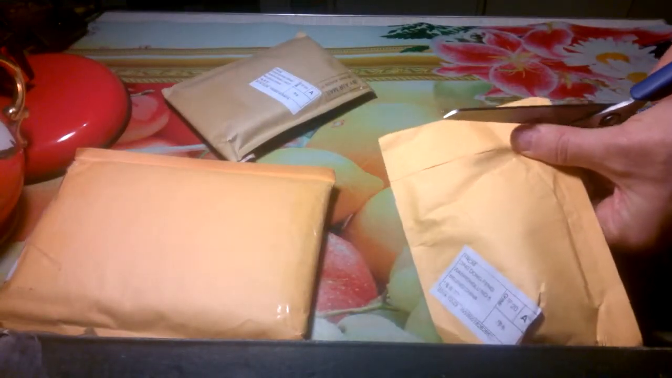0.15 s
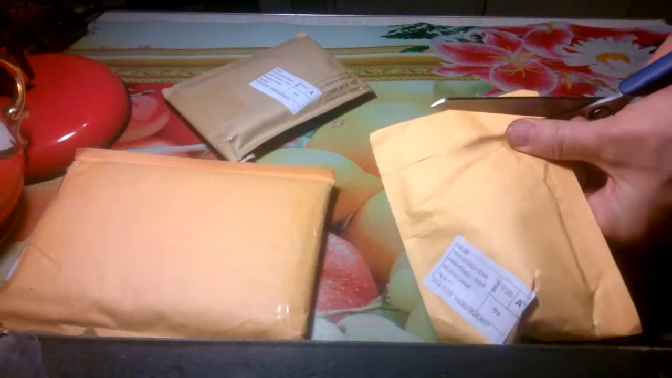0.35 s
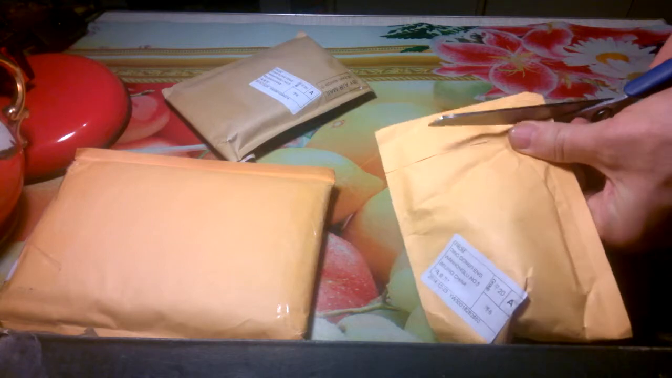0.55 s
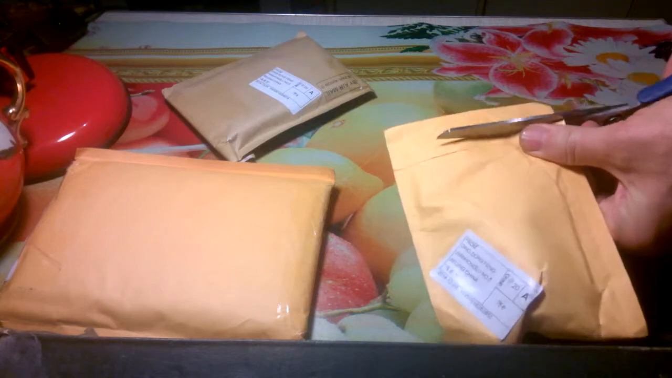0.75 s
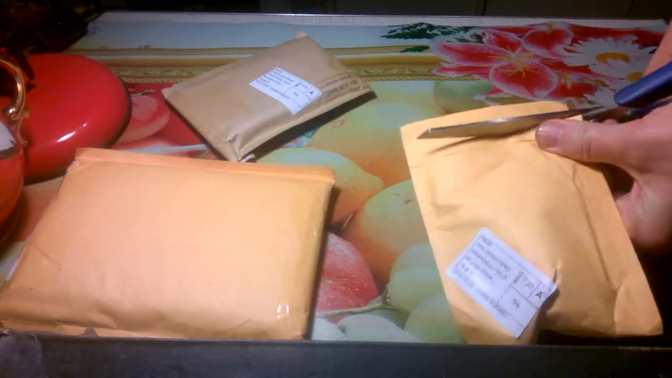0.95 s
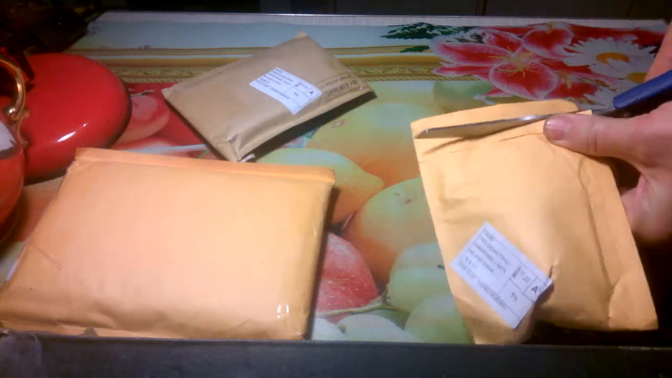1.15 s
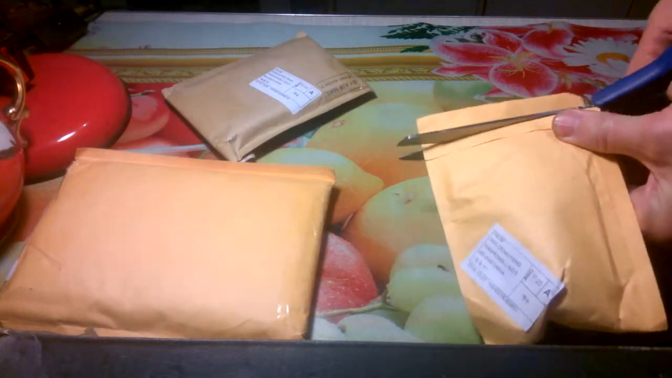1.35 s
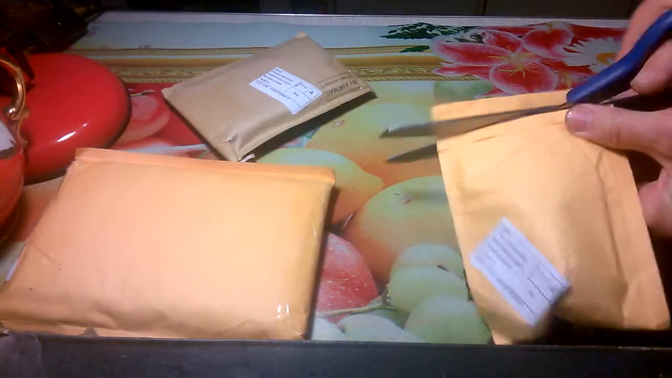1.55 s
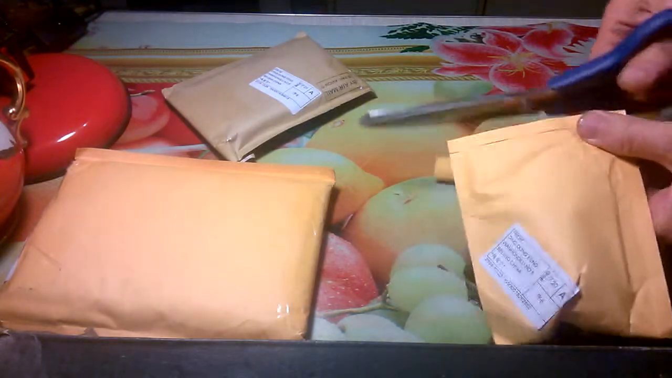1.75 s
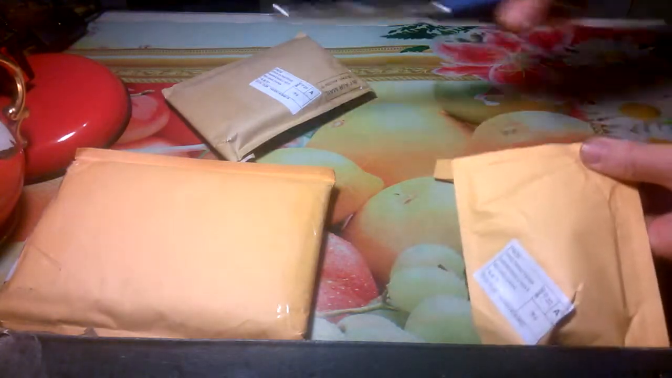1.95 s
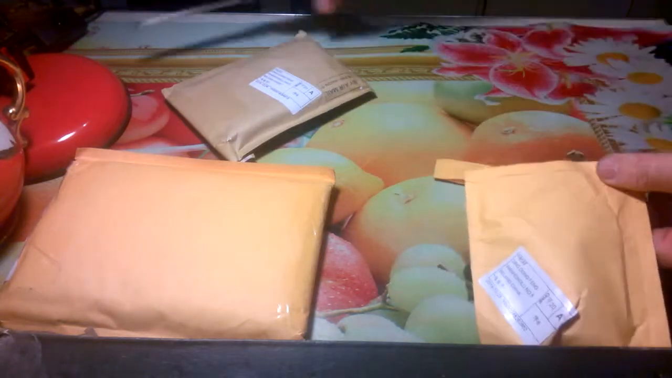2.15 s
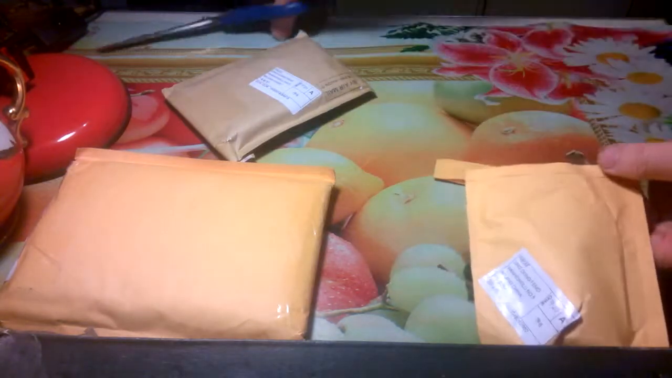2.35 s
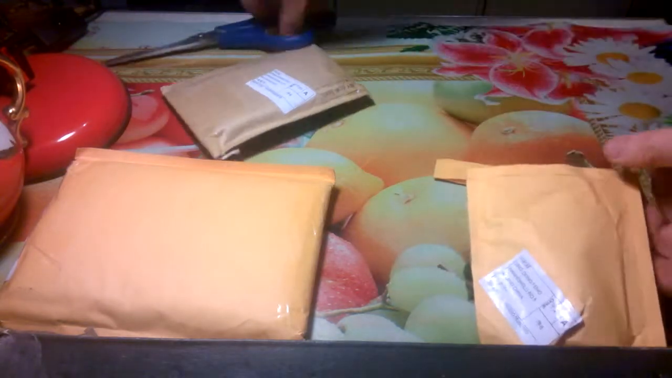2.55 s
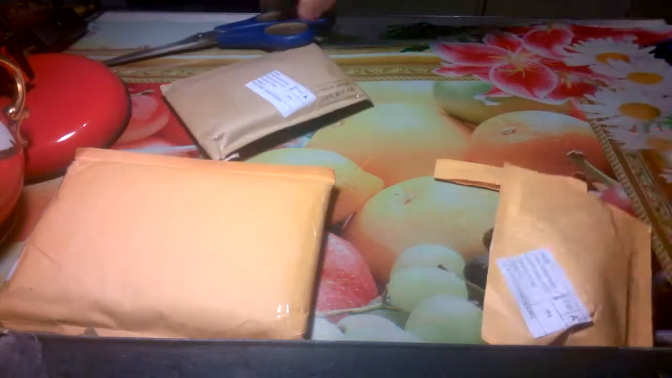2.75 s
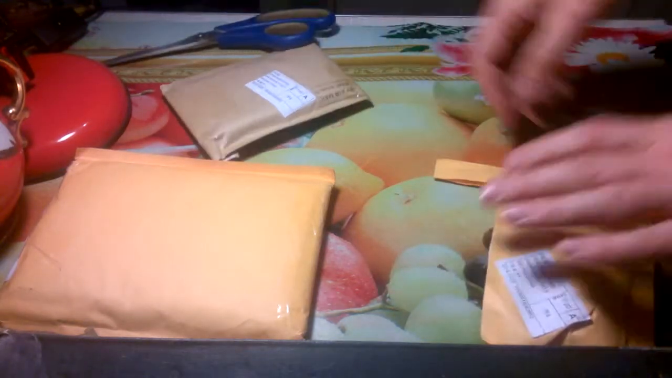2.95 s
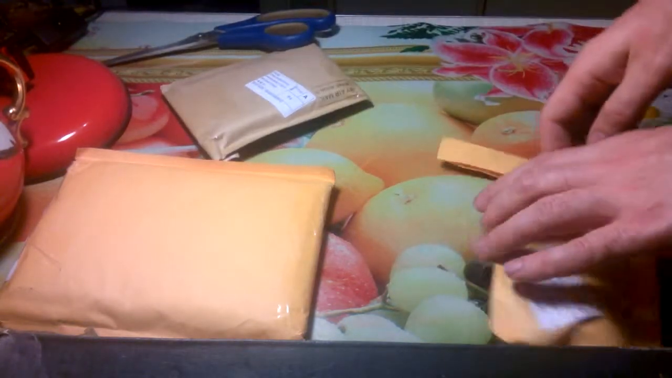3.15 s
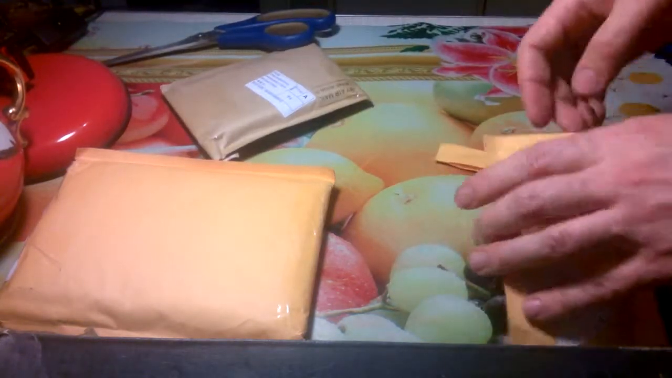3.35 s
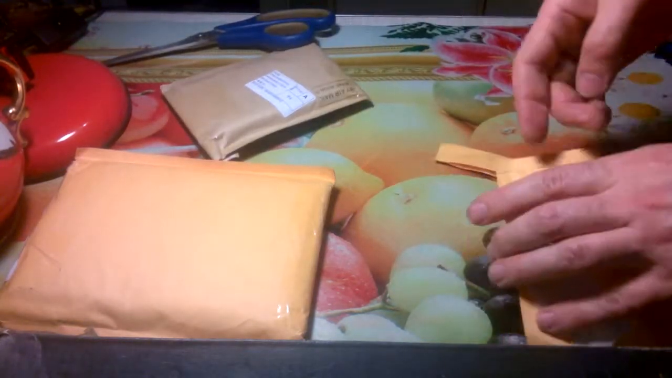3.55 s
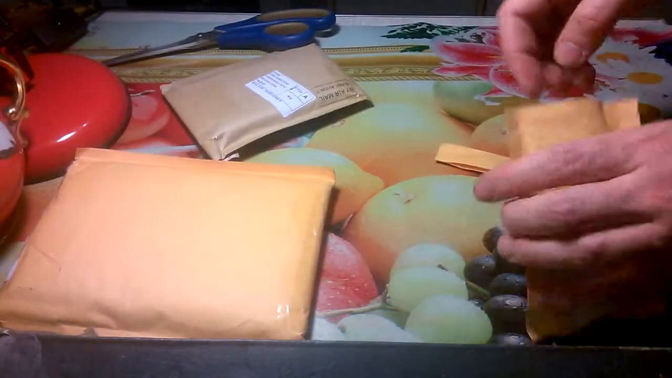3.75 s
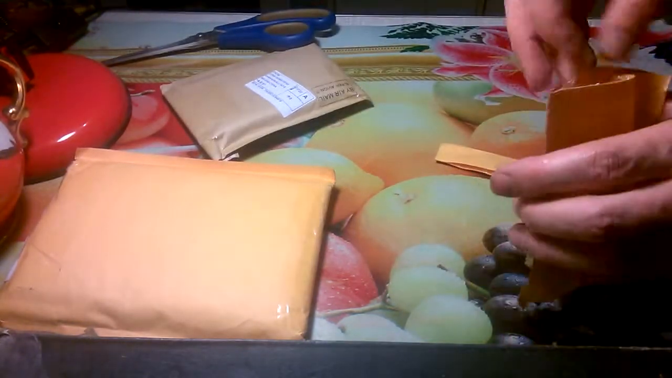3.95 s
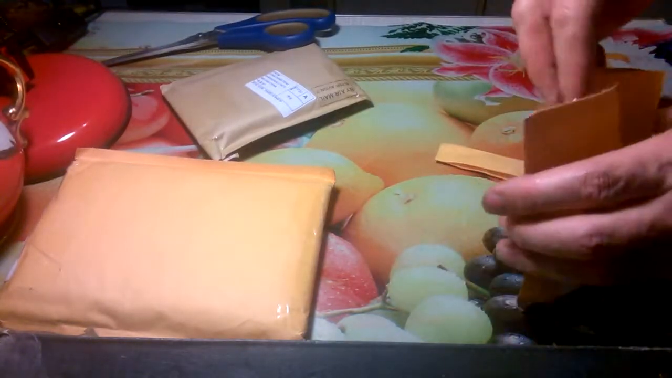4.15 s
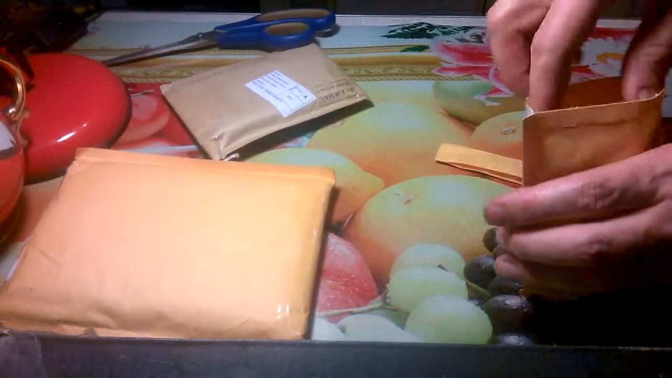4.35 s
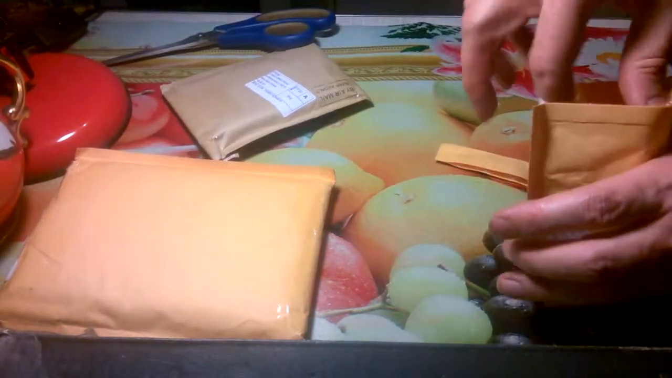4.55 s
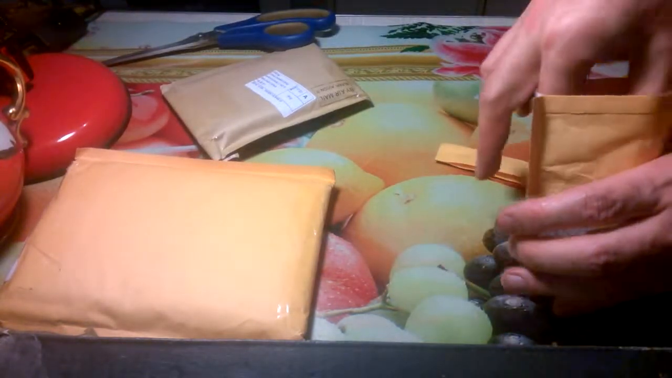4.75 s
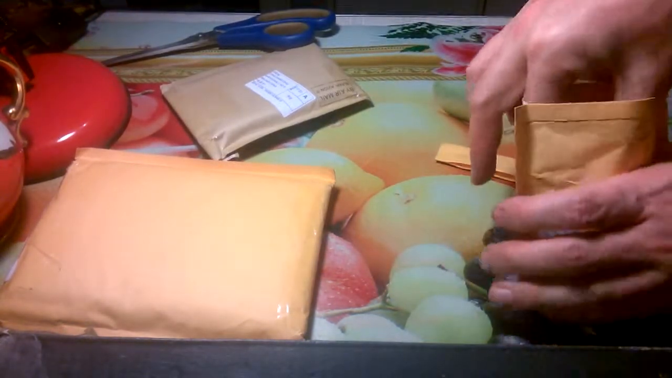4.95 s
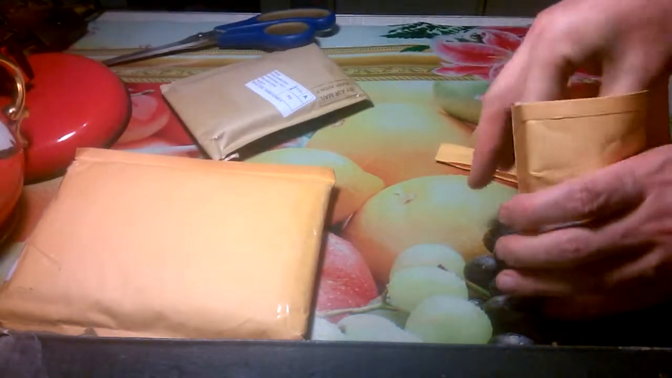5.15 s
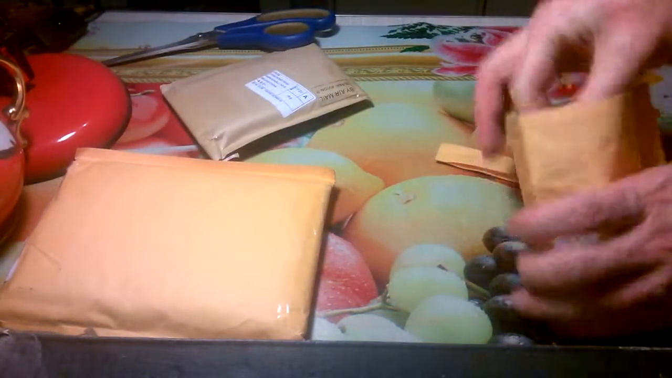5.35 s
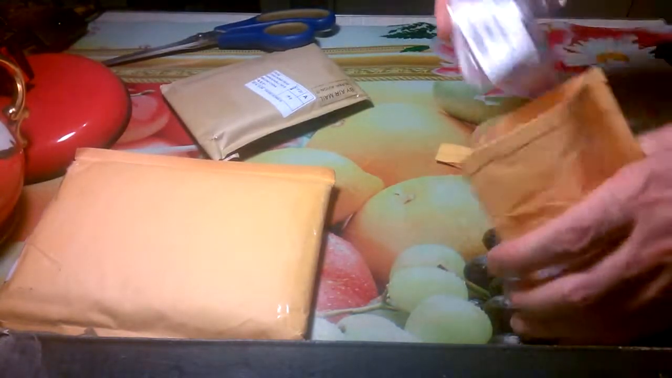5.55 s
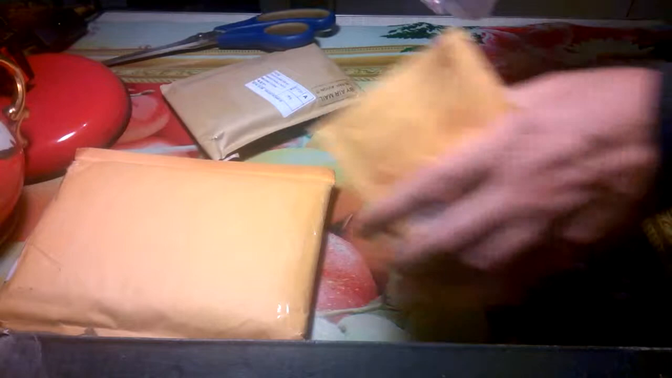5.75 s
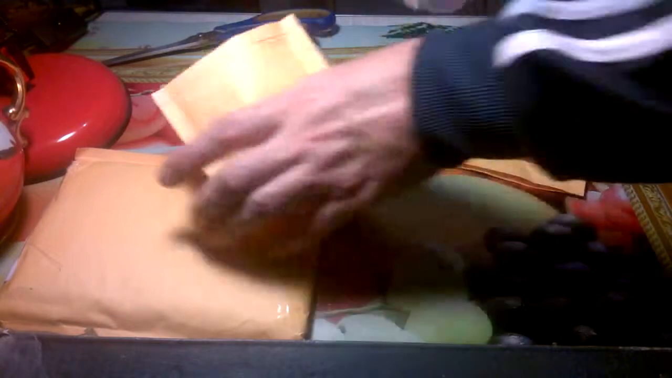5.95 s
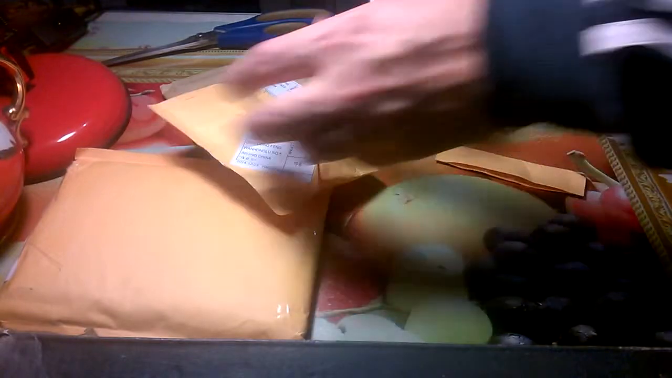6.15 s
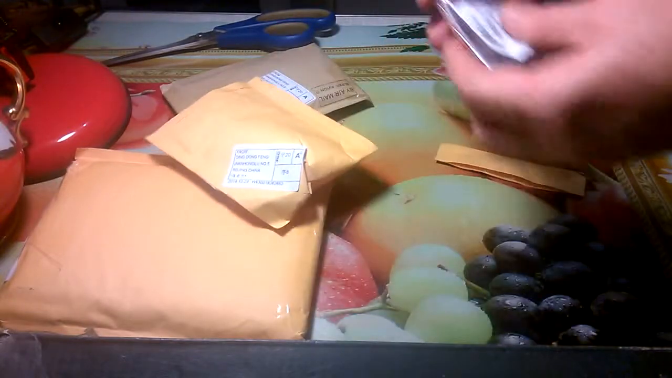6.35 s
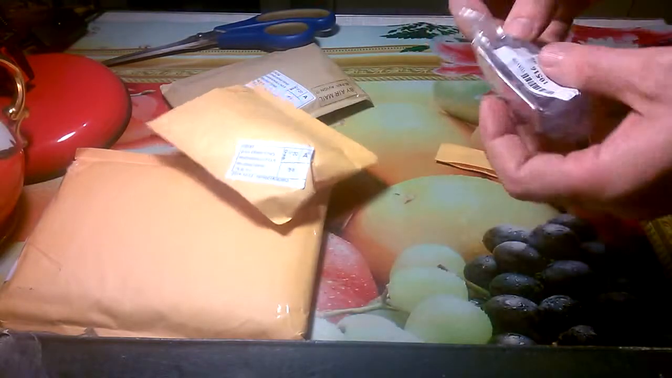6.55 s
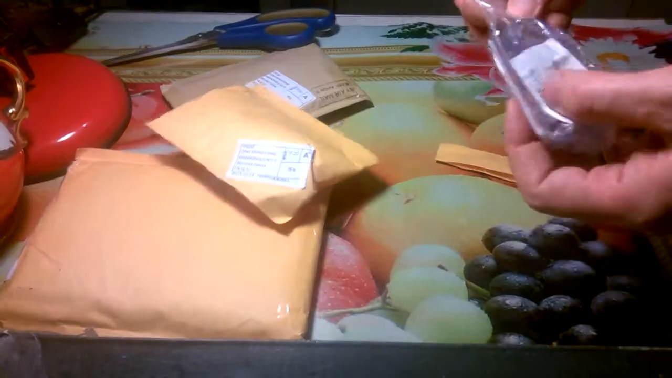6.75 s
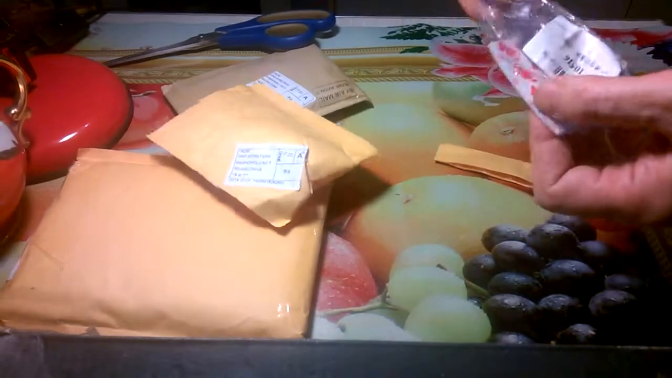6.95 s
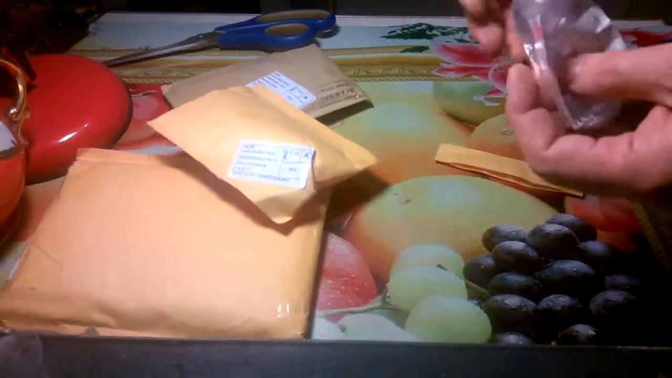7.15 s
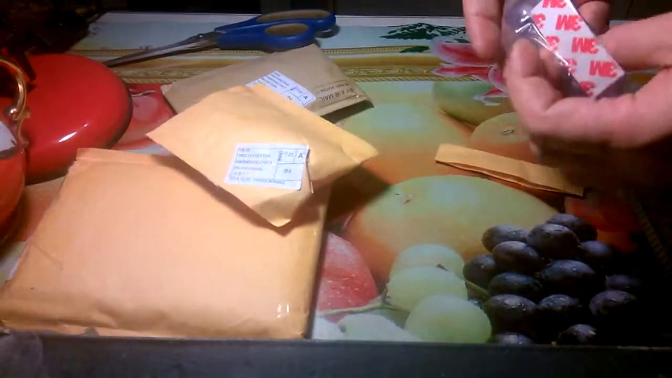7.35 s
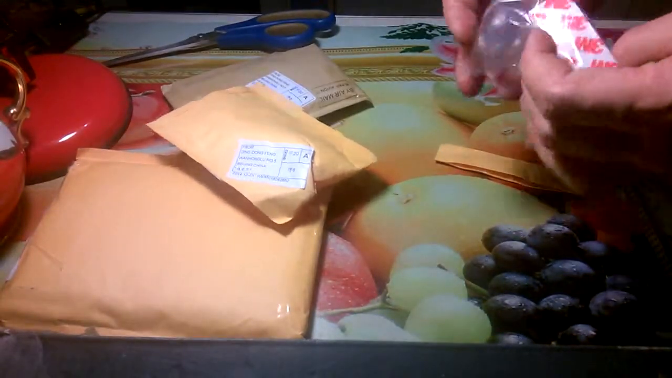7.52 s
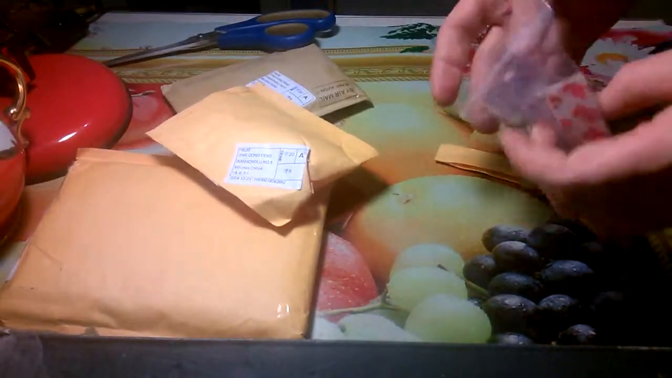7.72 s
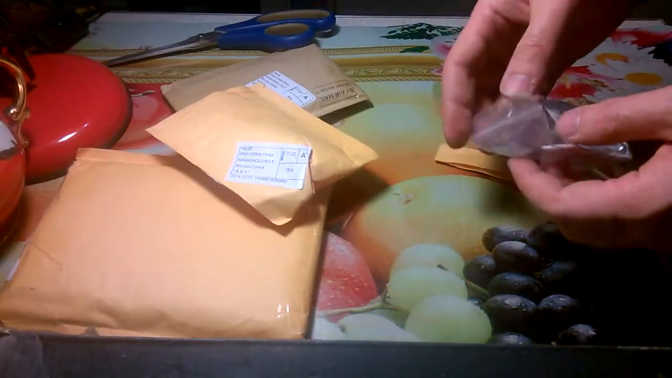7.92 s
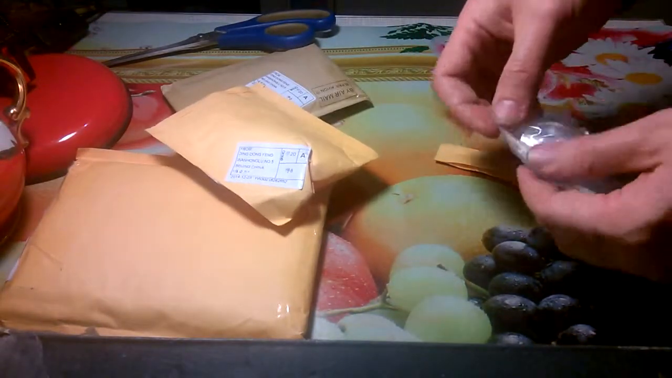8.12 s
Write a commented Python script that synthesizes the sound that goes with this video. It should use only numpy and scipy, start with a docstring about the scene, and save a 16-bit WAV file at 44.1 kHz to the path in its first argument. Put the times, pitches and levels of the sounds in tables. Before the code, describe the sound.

Scissors snip through a stiff padded paper envelope, get set down with a thud and clack, then paper rustles and a thin plastic bag crinkles.

```python
"""At a table in a small, hard-walled room with a faint hum, scissors cut the top off a padded paper mailer.
The scissors are put down; fingers spread the mailer, dig in it and pull out a small plastic bag.
The mailer is tossed aside and the bag is crinkled. One microphone channel; most direct sound tops its echoes.
Both sheets sound by friction and by buckling: a few loud snaps over many tiny ones, each answered by the room."""
import sys
import numpy as np
from scipy import signal
from scipy.fft import rfft, irfft, next_fast_len
from scipy.io import wavfile
from scipy.ndimage import uniform_filter1d, map_coordinates

SR = 44100
rng = np.random.default_rng(int(sys.argv[2]) if len(sys.argv) > 2 else 0)


def inscribe(sig):
    """Save sig as 16-bit PCM at rate SR to the path in sys.argv[1].

    A 1-D sig is mono; a 2-D sig holds one channel per row.
    Samples are clipped to [-1, 1] before scaling.
    """
    pcm = np.round(np.clip(np.atleast_2d(sig).T, -1, 1) * 32767)
    wavfile.write(sys.argv[1], SR, pcm.astype(np.int16))


N = 360940
TIME = np.arange(N) / SR  # s
FLEX_HZ, FIZZ_HZ, SPARKLE_HZ = 2200, 7800, 11000  # band edges: panels flex below, creases fizz and sparkle above
CRACK_LIFE_S = 0.0007  # a crease flips almost at once
SNAP_WET_DB = -3  # the walls' answer to a snap


def amp(db):
    """Decibels to amplitude."""
    return 10 ** (np.asarray(db) / 20)


def unit(x):
    """Scale a sound to rms 1."""
    return x / np.sqrt(np.mean(x ** 2) + 1e-20)


def along(points, hz):
    """Read a curve of (Hz, value) points on a log frequency axis."""
    point_hz, values = np.transpose(points)
    return np.interp(np.log(hz + 1), np.log(point_hz), values)


def wobble(rate):
    """A smooth random curve, rate knots a second."""
    knots = rng.standard_normal(int(N * rate / SR) + 4)
    return map_coordinates(knots, [TIME * rate])


def add(track, start_s, sound):
    """Mix a sound into a track from start_s."""
    part = track[max(round(start_s * SR), 0):][:len(sound)]
    part += sound[:len(part)]


def below(hz, edge_hz):
    """Gain of a steep low-pass."""
    return 1 / np.sqrt(1 + (hz / edge_hz) ** 10)


def above(hz, edge_hz):
    """Gain of the matching high-pass."""
    return np.sqrt(1 - below(hz, edge_hz) ** 2)


def bell(hz, pitch_hz, q):
    """Gain of one damped resonance; a higher q is narrower."""
    return 1 / np.sqrt(1 + (q * (hz / pitch_hz - pitch_hz / (hz + 1))) ** 2)


def colour(x, gain, size=4096):
    """Causal (minimum-phase) filter with a given gain over frequency."""
    hz = np.fft.rfftfreq(size, 1 / SR)
    cepstrum = irfft(np.log(np.maximum(gain(hz), 1e-6)))
    # fold the cepstrum onto positive time so the response starts at once
    cepstrum[1:size // 2] *= 2
    cepstrum[size // 2 + 1:] = 0
    response = irfft(np.exp(rfft(cepstrum)))
    return signal.fftconvolve(x, response)[:len(x)]


# how long the small room rings: pitch_hz [Hz], t60_s [s]
ROOM_DECAY = [(150, 0.23), (1000, 0.16), (5000, 0.27), (14000, 0.19)]


def room_tail(gap_s=0.0013, build_s=0.0045, size=8192):
    """The walls' answer, energy 1: a short gap, a swell of echoes, then decay."""
    hz, t, z = signal.stft(rng.standard_normal(size), SR, nperseg=256)
    decay = amp(-60 * t / along(ROOM_DECAY, hz)[:, None])
    tail = signal.istft(z * decay, SR, nperseg=256)[1][:size]
    since_gap = np.maximum(np.arange(size) / SR - gap_s, 0)
    tail = tail * (1 - np.exp(-since_gap / build_s))
    return tail / np.linalg.norm(tail)


def in_room(x, wet_db):
    """A sound plus its echoes off the walls."""
    return x + amp(wet_db) * signal.fftconvolve(x, room_tail())[:len(x)]


def shifting(x, depth_db):
    """A bending sheet's resonances come and go, in narrow and in wide patches of pitch."""
    z = signal.stft(x, nperseg=1024)[2]

    def patches(bins):
        noise = uniform_filter1d(rng.standard_normal(z.shape), bins, axis=0)
        return unit(uniform_filter1d(noise, size=7, axis=1))

    change_db = depth_db * (patches(bins=3) + 3.2 * patches(bins=14))
    return signal.istft(z * amp(change_db), nperseg=1024)[1][:N]


def crackle(rate, spread_db, friction_db):
    """Tiny buckles of very uneven size, rate a second, over a wash of friction; rms 1."""
    sizes = amp(spread_db * np.minimum(rng.exponential(size=N), 4))
    happens = rng.random(N) < rate / SR
    ticks = happens * sizes * rng.choice([-1, 1], N)
    return unit(unit(ticks) + amp(friction_db) * rng.standard_normal(N))


def swells(rows, rise, fall):
    """Each movement builds up, holds and dies away at fixed dB per s; overlapping ones add in power."""
    power = np.zeros(N)
    for start_s, length_s, level_db in rows:
        t = np.arange(-SR // 7, length_s * SR + SR // 4) / SR
        slope_db = rise * np.maximum(-t, 0) + fall * np.maximum(t - length_s, 0)
        shape = amp(level_db - slope_db) ** 2
        add(power, start_s + t[0], shape[start_s + t >= 0])
    return np.sqrt(power)


def effort(rows, rise, fall):
    """How strongly a series of movements makes a sheet scrape, flex and fizz."""
    scrape = swells([(s, length, db) for s, length, db, _, _ in rows], rise, fall)
    flex = swells([(s, length, db + flex_db) for s, length, db, flex_db, _ in rows], rise, fall)
    fizz = swells([(s, length, db + fizz_db) for s, length, db, _, fizz_db in rows], rise, fall)
    return np.array([scrape, flex, fizz])


def rustle(drive, spectrum, grain, hard_db, steepness, unsteady_db):
    """Whole panels flex low, surfaces scrape higher, creases fizz; hard strokes sparkle more at the very top."""
    scrape, flex, fizz = drive
    sparkle = fizz * np.clip(fizz / amp(hard_db), 0.26, 1.9) ** steepness
    size = next_fast_len(N)
    hz = np.fft.rfftfreq(size, 1 / SR)
    sheet = rfft(colour(grain, lambda f: amp(along(spectrum, f))), size)

    def band(gain):
        return irfft(sheet * gain ** 2, size)[:N]

    low = unit(band(below(hz, FLEX_HZ))) * flex
    middle = unit(band(above(hz, FLEX_HZ) * below(hz, FIZZ_HZ))) * scrape
    treble, top = band(above(hz, FIZZ_HZ)), band(above(hz, SPARKLE_HZ))
    high = ((treble - top) * fizz + top * sparkle) / np.std(treble)
    return (low + middle + high) * amp(unsteady_db * wobble(70))


def dip_before(rows, dip_db, approach_s=0.035):
    """Lower the rustle briefly ahead of each snap, so the snap starts out of a quieter sound."""
    nearness, t = np.zeros(N), np.arange(-SR // 8, 0) / SR
    for start_s, *_ in rows:
        add(nearness, start_s + t[0], np.exp(t[start_s + t >= 0] / approach_s))
    return amp(-dip_db * np.minimum(nearness, 1))


def snap(gain, life_s, wet_db, dull_hz, ring_db=-3, ring_life_s=0.0029, size=8192):
    """One burst of a few milliseconds and the room's answer; only the walls return its highest treble."""
    t = np.arange(size) / SR
    noise = rng.standard_normal(size) * np.exp(-t / life_s)
    burst = colour(noise, lambda hz: gain(hz) * below(hz, dull_hz))
    # a short random burst colours the echo, differently for every snap
    ring = rng.standard_normal(size) * np.exp(-t / ring_life_s)
    ring /= np.linalg.norm(ring)
    tail = room_tail()[:size]
    coloured_tail = tail + amp(ring_db) * signal.fftconvolve(tail, ring)[:size]
    echo = colour(coloured_tail, gain)
    to_3_ms = np.sqrt(0.003 * SR / size)  # the burst's level is its rms over 3 ms
    return (unit(burst) + amp(wet_db) * unit(echo)) * to_3_ms


def snaps(rows, spectrum, pop_life_s, pop_q, dull_hz):
    """A crease flips: the panel pops at its own pitch while its edge cracks."""
    out = np.zeros(N)

    def sheet(hz):
        return amp(along(spectrum, hz))

    for start_s, pop_db, pop_hz, crack_db in rows:
        def pop_gain(hz):
            return sheet(hz) * bell(hz, pop_hz, pop_q) * below(hz, 3480)

        def crack_gain(hz):
            return sheet(hz) * above(hz, FLEX_HZ)

        pop = snap(pop_gain, pop_life_s, SNAP_WET_DB, dull_hz)
        crack = snap(crack_gain, CRACK_LIFE_S, SNAP_WET_DB, dull_hz)
        add(out, start_s, amp(pop_db) * pop + amp(crack_db) * crack)
    return out


def struck(blows, modes, vary_db, detune, attack_s):
    """Each blow rings the same modes at slightly new strengths and pitches."""
    out, t = np.zeros(N), np.arange(SR // 2) / SR
    for start_s, blow_db in blows:
        ring = np.zeros(len(t))
        for pitch_hz, level_db, t60_s in modes:
            fading = amp(level_db + vary_db * rng.normal() - 60 * t / t60_s)
            ring += fading * np.sin(2 * np.pi * pitch_hz * (1 + detune * rng.normal()) * t)
        add(out, start_s, amp(blow_db) * ring * (1 - np.exp(-t / attack_s)))
    return out


# spectrum of the quiet room's hiss: pitch_hz [Hz], level_db [dB per Hz, relative]
ROOM_HISS = [(12, -38), (20, -2), (55, -4.5), (76, -5), (101, -12), (167, -2.5), (234, -12), (318, -9.5),
             (556, -20), (676, -11.5), (756, -30), (895, -17.5), (1290, -22.5), (5060, -24), (15900, -37)]


def room_tone():
    """Faint hiss and the low, wavering hum of an appliance."""
    hiss = unit(colour(rng.standard_normal(N), lambda hz: amp(along(ROOM_HISS, hz))))
    phase = 2 * np.pi * 48.7 * TIME + 0.36 * wobble(2.4)
    hum = np.sin(phase) * amp(0.31 * wobble(5.7))
    return amp(-69.5) * hiss + amp(-67.0) * hum


# paper fibres part and creases buckle: start_s [s], pop_db [dB], pop_hz [Hz], crack_db [dB]
PAPER_FLIPS = [(0.0395, -59.5, 1220, -68), (0.215, -51.5, 1010, -64), (0.3941, -56.5, 1130, -57),
               (0.6702, -42, 1710, -47), (0.6813, -45, 1600, -40), (0.6995, -41, 1450, -38.5),
               (0.7137, -42, 1270, -59), (0.9973, -41.5, 1310, -62), (1.024, -28.5, 1360, -32.5),
               (1.0515, -35.5, 1100, -34.5), (1.2714, -51, 990, -56), (1.378, -46, 1170, -48),
               (1.4407, -72, 1620, -52.5), (1.6785, -49, 1440, -44), (1.7581, -63, 1140, -52),
               (1.802, -60, 1310, -59), (2.5345, -39.5, 820, -36.5), (2.5501, -39, 860, -54),
               (2.7802, -60, 1350, -74), (3.1849, -50.5, 676, -63), (3.5119, -50, 1370, -72),
               (3.5564, -33.5, 1490, -36.5), (3.5586, -32.5, 1620, -43), (3.6556, -39, 1580, -50),
               (3.6819, -42.5, 1540, -53), (3.8267, -43.5, 1370, -59), (4.1302, -62, 1600, -57),
               (4.3397, -45.5, 1210, -46), (4.373, -32.5, 1390, -37), (4.5063, -43, 1510, -56),
               (4.824, -45.5, 1010, -63), (4.8473, -50, 1150, -49.5), (4.9247, -47, 1460, -70),
               (5.0148, -51.5, 1130, -48.5), (5.1268, -48.5, 1020, -66), (5.2702, -66, 2590, -55),
               (5.4272, -43, 1720, -43.5), (5.5005, -47, 1170, -59), (5.6705, -76, 2440, -57),
               (5.8354, -46, 1000, -76), (6.0805, -48.5, 720, -72), (6.1028, -46, 960, -69)]
# fingers shift, spread, dig in and toss the mailer; levels before the dip that dip_before() puts ahead of each snap:
# start_s [s], length_s [s], level_db [dB], flex_db [dB, relative], fizz_db [dB, relative]
MAILER_STROKES = [(0.043, 0.054, -80, 8, -20), (0.175, 0.055, -64, 1.5, -15), (0.316, 0.049, -72.5, 2, -23),
                  (0.592, 0.05, -68, 5.5, -14), (1.745, 0.05, -54, -6, -15.5), (1.9, 0.22, -78.5, 3.5, -15),
                  (2.547, 0.014, -46.5, -1.5, -9.5), (2.665, 0.16, -71, 1, -19),
                  (3.075, 0.14, -70.5, 8, -9), (3.158, 0.39, -65, 0.5, -18), (3.241, 0.042, -60, -5, -5.5),
                  (3.56, 0.017, -43, -6.5, -13.5), (3.67, 0.0086, -48.5, -4, -40),
                  (3.736, 0.089, -63, -2.5, -15), (3.835, 0.025, -60, -1, -8),
                  (3.95, 0.13, -66.5, -1.5, -14), (4.109, 0.044, -60, 3, 3), (4.209, 0.11, -63.5, 0, -6.5),
                  (4.356, 0.018, -44, -8.5, -1.5), (4.495, 0.021, -60, 4.5, -4),
                  (4.583, 0.087, -63, 1.5, -2), (4.647, 0.19, -60.5, -11, 2), (4.82, 0.041, -51.5, 1, -8),
                  (4.937, 0.032, -63.5, 9, -24), (5.023, 0.03, -52.5, -1, -9.5), (5.141, 0.03, -53, 0, -16),
                  (5.258, 0.025, -54.5, -1, -14), (5.343, 0.092, -58, 0, -21),
                  (5.412, 0.093, -50, -1, -4.5), (5.55, 0.047, -64.5, -7, -15), (5.676, 0.023, -65, -8, -2),
                  (5.839, 0.02, -67, 9.5, -17), (6.022, 0.026, -57, -6, -14), (6.113, 0.026, -57, 5, -5)]
# spectra of rubbed and of snapping paper: pitch_hz [Hz], level_db [dB per Hz, relative]
PAPER_RUB_COLOUR = [(90, -41), (160, -18), (350, -9), (520, -11), (780, -5), (1150, -2.5), (1500, -4.5),
                    (2200, -3), (3200, -3), (4300, 2), (7400, -5), (10000, -20.5), (12000, -29.5),
                    (16000, -47)]
PAPER_SNAP_COLOUR = [(150, -12.5), (500, 0), (800, 0), (1250, -4), (2000, -5), (2800, -2.5), (4300, -4),
                     (6000, -5.5), (8000, -13), (10500, -21.5), (16000, -28)]


def mailer():
    """Stiff paper: dense fibre noise, hollow pops, dragging fingers, cuts and glides."""
    fibres = shifting(crackle(rate=500, spread_db=7.0, friction_db=5.5), depth_db=1.0)
    grain = in_room(fibres, wet_db=-7)
    drive = effort(MAILER_STROKES, rise=720, fall=293)
    rubbing = rustle(drive, PAPER_RUB_COLOUR, grain, hard_db=-56, steepness=0.49, unsteady_db=-0.5)
    pops = snaps(PAPER_FLIPS, PAPER_SNAP_COLOUR, pop_life_s=0.0012, pop_q=2.8, dull_hz=9500)
    return (rubbing + cutting()) * dip_before(PAPER_FLIPS, dip_db=3.5) + pops + drags() + glides()


# a finger drags on a taut panel: middle_s [s], half_s [s], level_db [dB], pitch_hz [Hz]
FINGER_DRAGS = [(0.191, 0.021, -62.5, 2230), (0.2, 0.027, -62, 1010), (0.884, 0.032, -52, 3150),
                (3.565, 0.022, -43, 1390), (3.845, 0.014, -54, 1240), (4.585, 0.018, -59.5, 1880),
                (4.95, 0.011, -52.5, 1700), (5.29, 0.026, -54, 2760), (6.037, 0.019, -57, 1480),
                (6.614, 0.024, -53, 1030)]


def drags(q=5.0, rough_db=2, size=16384):
    """Short swells of friction through one panel resonance, at the panel's own pitch."""
    out, t = np.zeros(N), (np.arange(size) - size // 2) / SR
    for middle_s, half_s, level_db, pitch_hz in FINGER_DRAGS:
        friction = unit(colour(rng.standard_normal(size), lambda hz: bell(hz, pitch_hz, q / 2) ** 2))
        swell = np.exp(-(t / half_s) ** 2 / 2)
        add(out, middle_s + t[0], friction * amp(level_db) * swell)
    return out * amp(rough_db * wobble(200))


# the mailer glides lightly over a smooth surface: start_s [s], length_s [s], level_db [dB]
LIGHT_GLIDES = [(0.45, 0.074, -69.5), (0.56, 0.12, -66), (1.8, 0.36, -77.5), (2.493, 0.045, -59),
                (2.65, 0.2, -72), (4.015, 0.045, -62), (4.68, 0.13, -61), (5.74, 0.12, -69.5),
                (5.92, 0.058, -61)]
# spectrum of the gliding hiss: pitch_hz [Hz], level_db [dB per Hz, relative]
GLIDE_HISS = [(500, -12.5), (1200, -7.5), (2800, -6), (4200, -5), (5500, 2.5), (7000, -3.5), (9000, -20.5),
              (14000, -25)]


def glides():
    """Light sliding bends no fibres: only a thin, smooth hiss."""
    contact = crackle(rate=1100, spread_db=4, friction_db=4)
    hiss = unit(colour(contact, lambda hz: amp(along(GLIDE_HISS, hz))))
    return hiss * swells(LIGHT_GLIDES, rise=430, fall=500)


# the blades close and shear the paper: start_s [s], length_s [s], level_db [dB]
BLADE_CUTS = [(0.669, 0.03, -44), (1.025, 0.045, -40), (1.353, 0.042, -44), (1.675, 0.021, -43)]
# the blades reopen and slide on along the slit:
# start_s [s], length_s [s], level_db [dB], flex_db [dB, relative], fizz_db [dB, relative]
BLADE_SLIDES = [(0.878, 0.041, -51.5, -5.5, -12.5), (1.235, 0.039, -53.5, -5, -7),
                (1.568, 0.026, -51.5, -2.5, -9.5)]
# spectrum of sheared paper: pitch_hz [Hz], level_db [dB per Hz, relative]
SHEAR_COLOUR = [(90, -47), (160, -16.5), (350, -11), (520, -10.5), (800, -3.5), (1150, 0), (1500, -5.5),
                (2200, -5), (2800, -9.5), (3700, -6.5), (5200, -5.5), (7400, -9.5), (10000, -19.5),
                (12000, -33.5), (16000, -37)]


def cutting(flex_db=-2, fizz_db=-8):
    """Four gritty cuts; between them the blades reopen and slide forward."""
    cuts = [(s, length, db, flex_db, fizz_db) for s, length, db in BLADE_CUTS]
    closing = effort(cuts, rise=670, fall=345)
    sliding = effort(BLADE_SLIDES, rise=300, fall=370)
    fibres = shifting(crackle(rate=700, spread_db=2.5, friction_db=-1), depth_db=1.0)
    grain = in_room(fibres, wet_db=-6)
    drive = np.hypot(closing, sliding)
    return rustle(drive, SHEAR_COLOUR, grain, hard_db=-59, steepness=0.7, unsteady_db=0.6)


# the padded mailer and the hands bump softly: start_s [s], level_db [dB], pitch_hz [Hz]
SOFT_BUMPS = [(1.053, -59, 230), (1.672, -54.5, 130), (2.534, -47.5, 153), (3.559, -52.5, 105),
              (4.108, -59.5, 180), (4.332, -50, 134), (4.574, -51.5, 115), (4.629, -53.5, 150),
              (4.813, -50, 160), (5.011, -57, 141), (5.134, -53.5, 135), (6.1, -53, 85),
              (6.105, -48.5, 333), (6.21, -53, 74.4), (6.721, -53, 110), (6.789, -55.5, 84.4)]


def bumps(attack_s=0.0012, t60_s=0.19, q=1.14, size=12000):
    """Soft contacts give a dull puff with no ring."""
    out, t = np.zeros(N), np.arange(size) / SR
    for start_s, level_db, pitch_hz in SOFT_BUMPS:
        noise = rng.standard_normal(size)
        puff = unit(colour(noise, lambda hz: below(hz, 4 * pitch_hz) * bell(hz, pitch_hz, q)))
        fading = amp(level_db - 60 * t / t60_s) * (1 - np.exp(-t / attack_s))
        add(out, start_s, puff * fading)
    return out


# the scissors land and rock back, then a hand comes down on the table: start_s [s], level_db [dB]
BLOWS_ON_TABLE = [(2.2865, -32.5), (2.3285, -33.5), (3.063, -46.5)]
# the blades click: start_s [s], level_db [dB]
STEEL_CLICKS = [(2.2855, -40.5), (2.293, -49), (2.31, -49), (2.326, -46)]
# ringing modes of the table top and of the blades: pitch_hz [Hz], level_db [dB, relative], t60_s [s]
TABLE_MODES = [(127, -20, 0.11), (147, 4, 0.097), (180, -1, 0.081), (239.6, -13, 0.19), (280, -10.5, 0.12),
               (462, -22.5, 0.13), (620, -9.5, 0.05)]
STEEL_MODES = [(3450, -10, 0.027), (3900, -14, 0.02), (4420, -5, .015), (4880, 4, 0.0073),
               (6500, 2.5, 0.0064)]
# the scissors skid as they settle: start_s [s], length_s [s], level_db [dB]
SCISSORS_SKID = [(2.288, 0.02, -52)]
# spectrum of the skid: pitch_hz [Hz], level_db [dB per Hz, relative]
SKID_SPECTRUM = [(410, -43), (700, 3), (745, -8), (1620, -6.5), (2740, -12), (3480, -2.5), (5270, -8),
                 (9140, -19), (14000, -47)]


def scissors():
    """The table top thuds under hard blows and the blades clatter and skid."""
    thuds = struck(BLOWS_ON_TABLE, TABLE_MODES, vary_db=3.5, detune=0.0058, attack_s=0.0047)
    clicks = struck(STEEL_CLICKS, STEEL_MODES, vary_db=2, detune=0.0245, attack_s=0.000084)
    clinks = in_room(clicks, wet_db=-6.0)
    contact = crackle(rate=780, spread_db=5, friction_db=4)
    grit = unit(colour(contact, lambda hz: amp(along(SKID_SPECTRUM, hz))))
    return thuds + clinks + grit * swells(SCISSORS_SKID, rise=3400, fall=160)


# large creases of the film flip over: start_s [s], pop_db [dB], crack_db [dB]
FILM_FLIPS = [(6.1636, -49, -55), (6.204, -61, -53), (6.2707, -63, -52), (6.3698, -50, -41),
              (6.3799, -42, -55), (6.402, -48, -53), (6.5425, -44, -37.5), (6.5872, -49, -55),
              (6.6, -44.5, -60), (6.6253, -41, -41), (6.6474, -44, -37), (6.6853, -34.5, -30.5),
              (6.706, -50, -28.5), (6.7146, -37, -32), (6.758, -42, -50), (6.8064, -42, -44),
              (6.921, -62, -35), (6.999, -62, -43), (7.0257, -63, -43), (7.06, -48, -41.5),
              (7.0687, -43, -52), (7.166, -45, -35), (7.1787, -48, -42), (7.2063, -60, -38),
              (7.2516, -72, -43.5), (7.3933, -53, -39), (7.4187, -56, -35), (7.4277, -54, -35),
              (7.523, -65, -45), (7.559, -61, -42), (7.5798, -58, -35), (7.7118, -53, -68),
              (7.765, -59, -37), (7.9205, -63, -40), (7.9897, -59, -43.5), (8.083, -47.5, -50),
              (8.1018, -45, -53)]
# fingers squeeze and turn the bag; levels before the dip that dip_before() puts ahead of each snap:
# start_s [s], length_s [s], level_db [dB], flex_db [dB, relative], fizz_db [dB, relative]
BAG_SQUEEZES = [(6.19, 0.072, -52.5, -9.5, -1.5), (6.363, 0.021, -42, -7.5, -6.5),
                (6.434, 0.076, -54.5, -7, -3.5), (6.55, 0.095, -47.5, -11, -9),
                (6.665, 0.074, -39.5, -5.5, -4), (6.77, 0.11, -52, -7, -10), (6.922, 0.025, -42, -9, -9),
                (7.06, 0.079, -46.5, -10, -8), (7.166, 0.026, -40.5, -9, -10),
                (7.345, 0.04, -46.5, -14.5, -15), (7.405, 0.045, -40, -15, -8),
                (7.49, 0.056, -48, -11.5, -9), (7.57, 0.028, -47, -8.5, -3.5),
                (7.732, 0.032, -45, -9.5, -10.5), (7.875, 0.039, -45.5, -12, -16),
                (7.994, 0.052, -46.5, -10, -6), (8.085, 0.063, -45, -15.5, -10.5)]
# spectra of rubbed and of snapping film: pitch_hz [Hz], level_db [dB per Hz, relative]
FILM_RUB_COLOUR = [(120, -33.5), (300, -16), (450, -12.5), (700, -9.5), (1000, -6), (1600, -10.5),
                   (2400, -4), (3300, 0), (4100, 2.5), (5900, -1.5), (7700, -1.5), (10000, -8),
                   (12000, -12.5), (16000, -22)]
FILM_SNAP_COLOUR = [(200, -20), (600, -21), (1000, -10), (1700, -24), (2600, -2), (3900, 1.5), (5500, -0.5),
                    (7500, 6), (9500, -2), (12000, -13), (16000, -18)]


def plastic_bag(crinkle_share=0.37, pop_hz=1200):
    """Thin film: brighter crinkles with less friction under them; small panels pop at much the same pitch."""
    fine = shifting(crackle(rate=520, spread_db=3.6, friction_db=3.0), depth_db=0.8)
    # the share is one of power
    mixed = np.sqrt(1 - crinkle_share) * fine + np.sqrt(crinkle_share) * crinkles()
    grain = in_room(mixed, wet_db=-6)
    drive = effort(BAG_SQUEEZES, rise=420, fall=264)
    rubbing = rustle(drive, FILM_RUB_COLOUR, grain, hard_db=-47.0, steepness=0.75, unsteady_db=1.05)
    creases = [(s, pop_db, pop_hz, crack_db) for s, pop_db, crack_db in FILM_FLIPS]
    pops = snaps(creases, FILM_SNAP_COLOUR, pop_life_s=0.00045, pop_q=0.74, dull_hz=9800)
    return rubbing * dip_before(FILM_FLIPS, dip_db=3.0) + pops


# pitches of long, middling and short creases in the film: pitch_hz [Hz]
CREASE_PITCHES = [2580, 4300, 7700]


def crinkles(rate=75, q=1.23):
    """Separate small creases flip at random, each with the pitch of its size."""
    out = np.zeros(N)
    for pitch_hz in CREASE_PITCHES:
        flips = crackle(rate, spread_db=3.0, friction_db=-27)
        out += unit(colour(flips, lambda hz: bell(hz, pitch_hz, q)))
    return unit(out)


def scene():
    """Everything at the table, on one channel."""
    return (room_tone() + mailer() + bumps() + scissors() + plastic_bag())[None]


def record(dry):
    """The microphone's signal keeps nothing above its band limit."""
    top_hz = 15900
    size = next_fast_len(N + SR // 2)
    kept = np.fft.rfftfreq(size, 1 / SR) < top_hz
    return irfft(rfft(dry, size) * kept, size)[..., :N]


dry = scene()
out = record(dry)
inscribe(out)
```